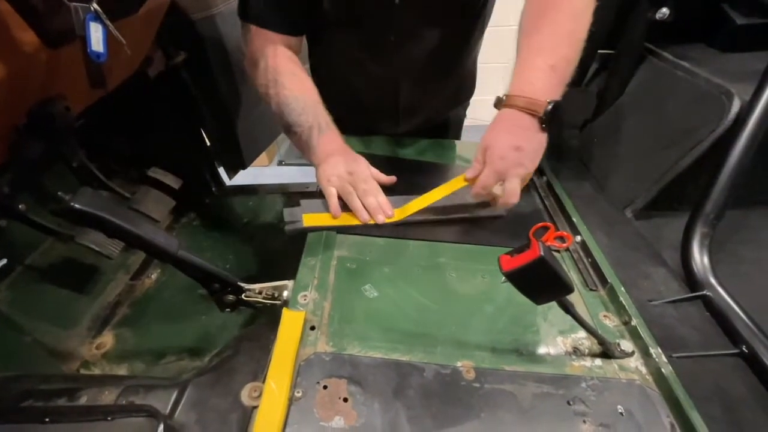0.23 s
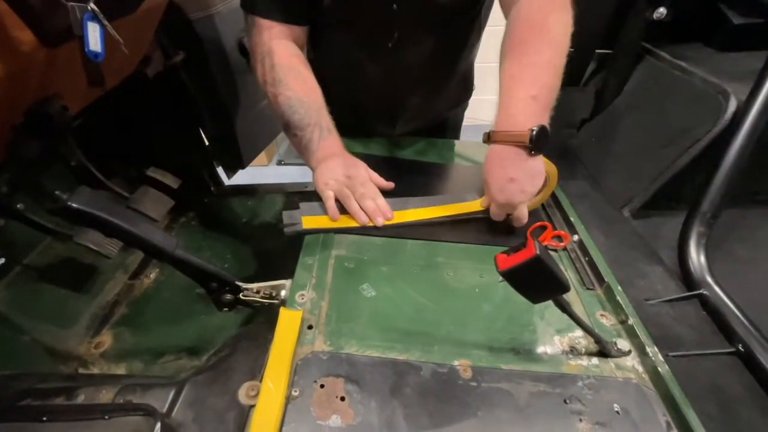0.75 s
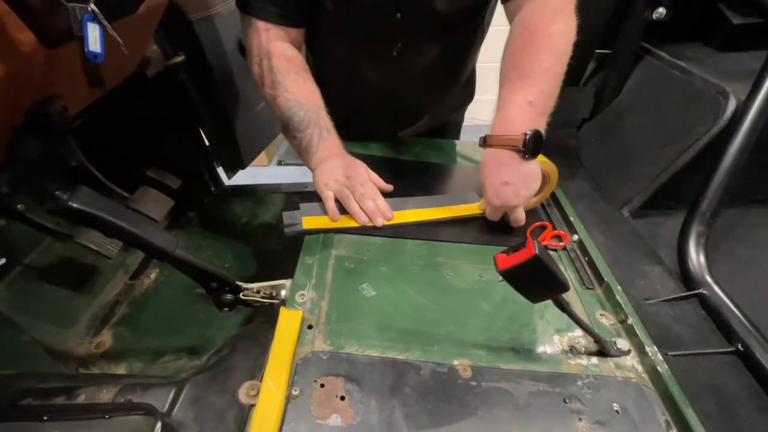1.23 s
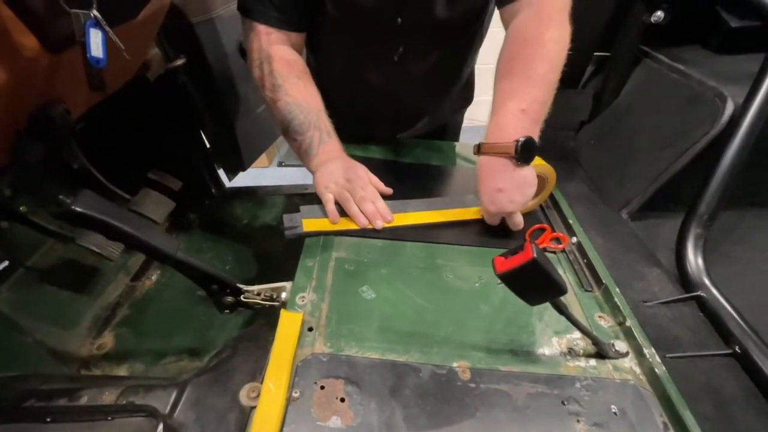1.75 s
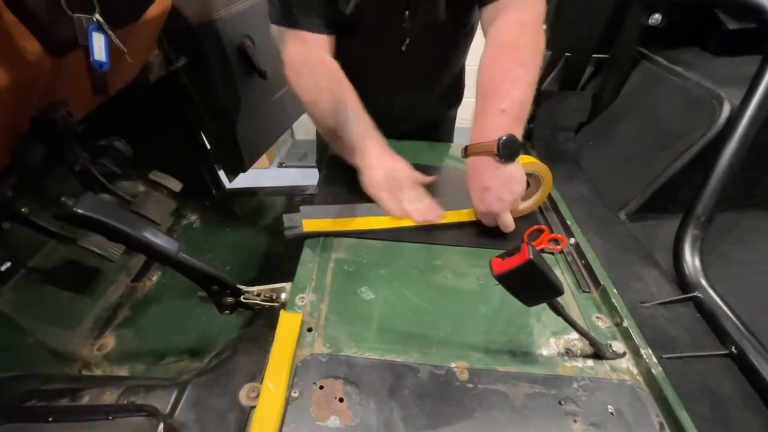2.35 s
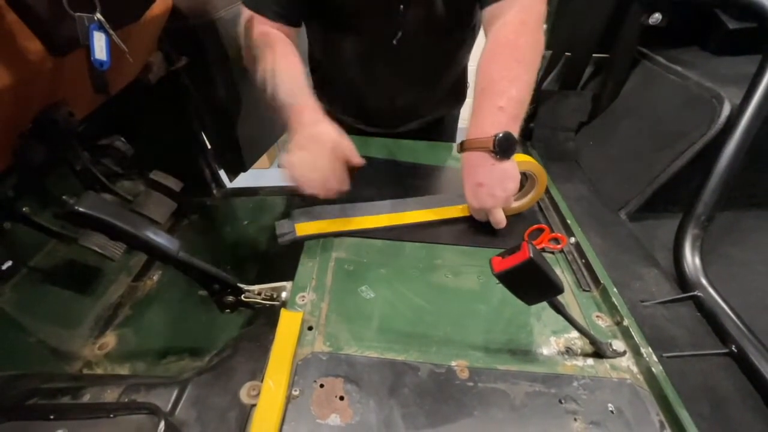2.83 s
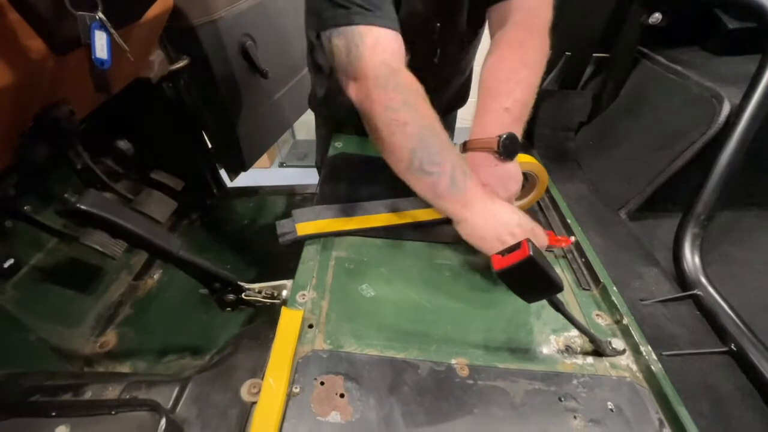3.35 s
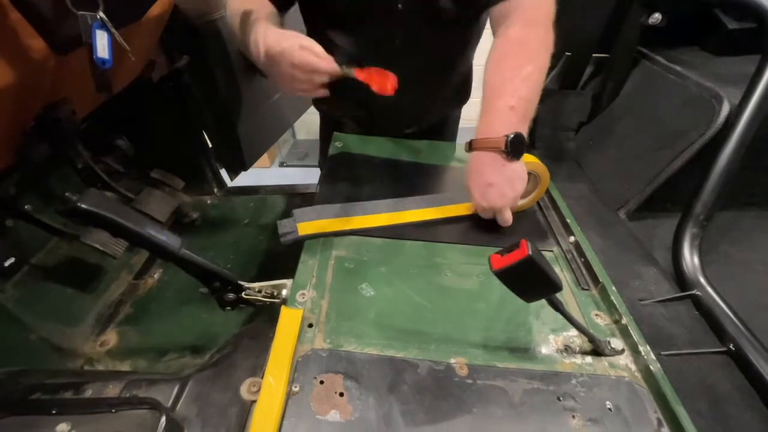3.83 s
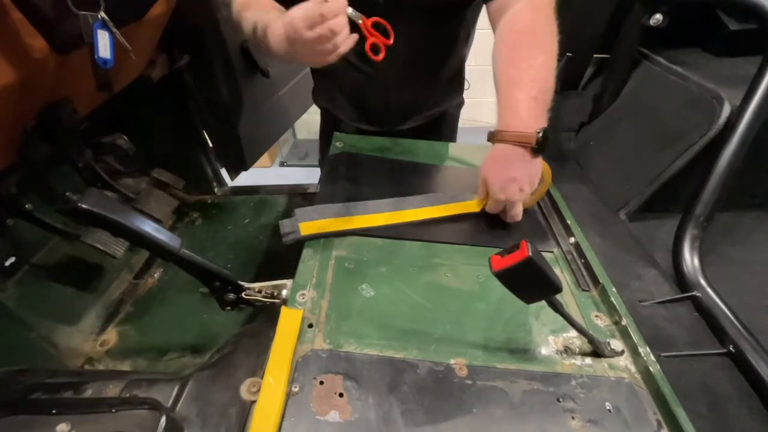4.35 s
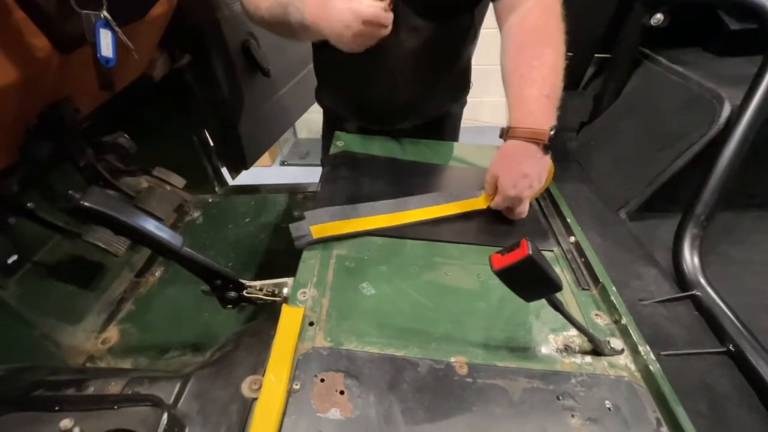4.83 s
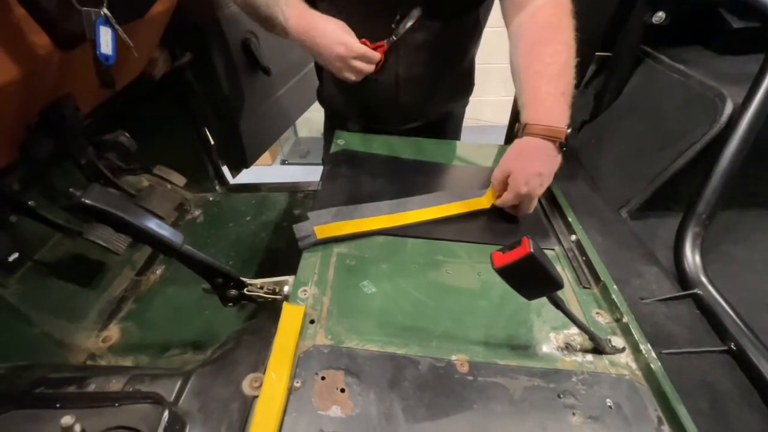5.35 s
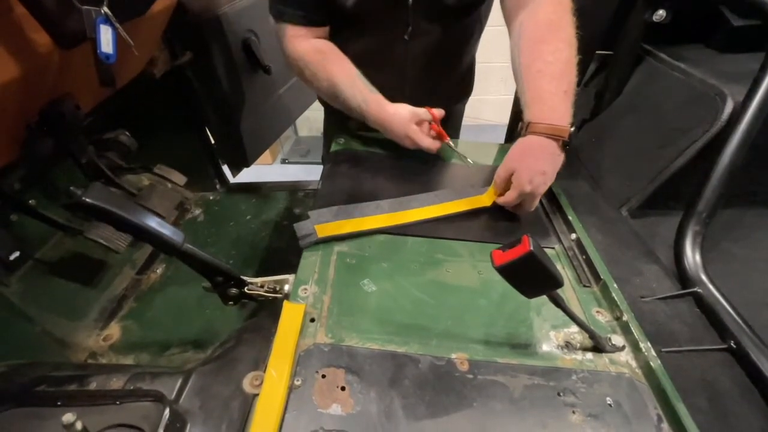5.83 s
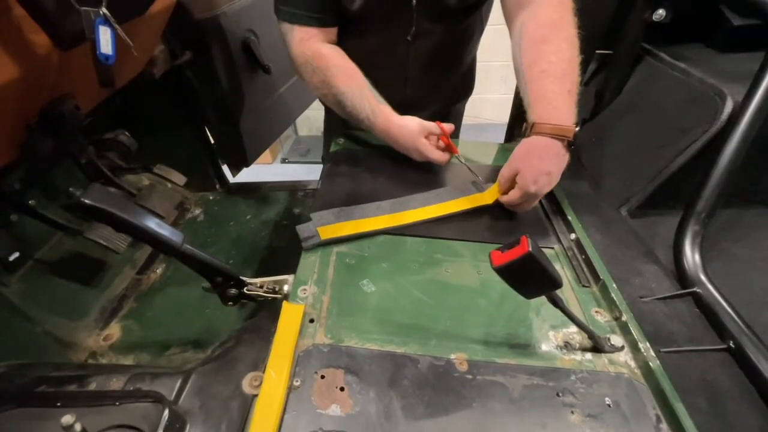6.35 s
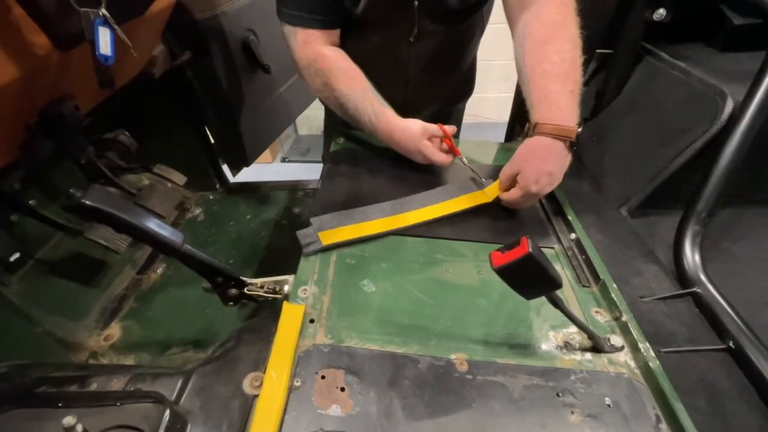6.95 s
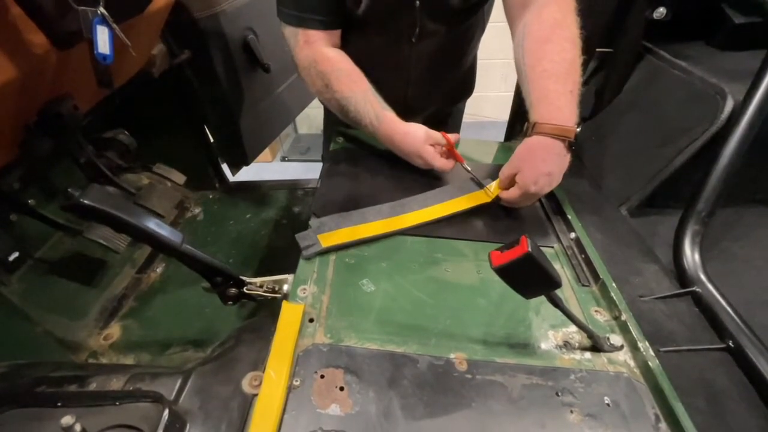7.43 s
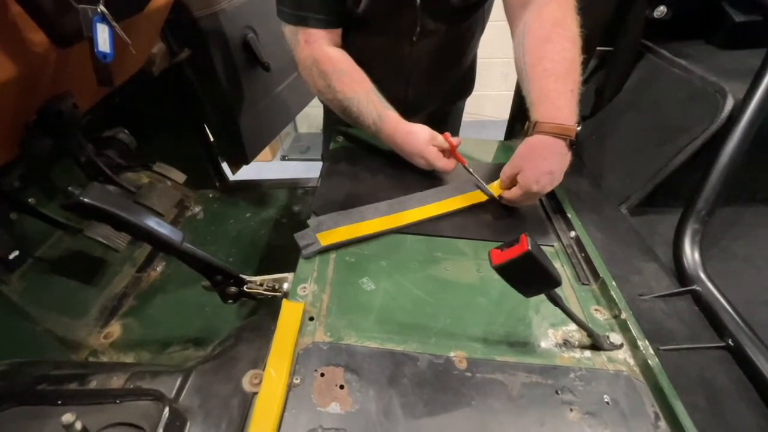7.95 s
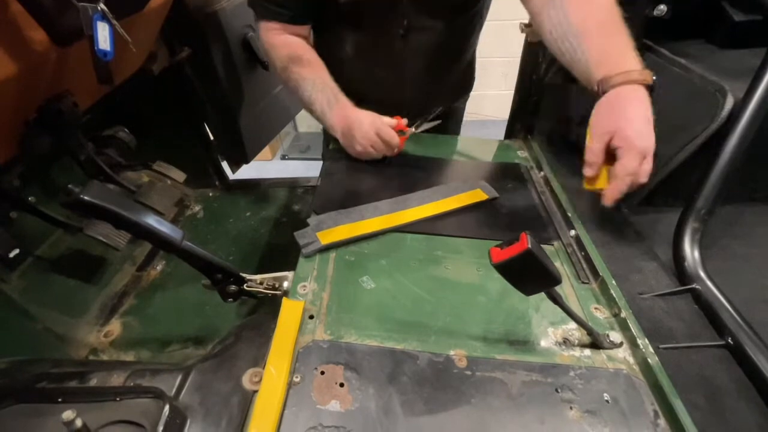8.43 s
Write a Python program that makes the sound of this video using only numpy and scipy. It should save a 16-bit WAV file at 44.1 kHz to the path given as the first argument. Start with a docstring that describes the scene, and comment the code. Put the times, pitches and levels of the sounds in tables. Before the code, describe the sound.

Close up in a metal vehicle interior, tape peels with fine crackling hiss, then a hand presses and rubs it onto carpet with soft hollow thuds. Scissors are picked up with small taps, click open and shut, pause, then cut the tape with one loud, bright snap. Light rustle and a dull thud end it. Distant machinery hums throughout; close stereo pickup, crisp and hissy on top.

```python
"""Sticky tape on a hollow floor

Close at hand, sticky tape is pulled off its roll, smoothed onto carpet on a hollow metal floor and cut with
small scissors. Glue crackles and blades crack as short noise sprays; blades, panel and taps ring as dying sines.
Palm and sleeves rustle and drag as coloured noise; far off, workshop machinery drones, hums and whirrs.
A pair of microphone ports, whose difference rings near 10 kHz, picks it all up."""
import sys
import numpy as np
from scipy import signal
from scipy.fft import rfft, irfft, next_fast_len
from scipy.io import wavfile

SR = 44100
rng = np.random.default_rng(int(sys.argv[2]) if len(sys.argv) > 2 else 0)


def wav_record(signal):
    """Record a signal, one row per channel, as 16-bit PCM in the file named by sys.argv[1]."""
    frames = np.transpose(np.atleast_2d(signal))
    bounded = np.clip(frames, -1, 1)
    # unit amplitude maps onto the largest positive 16-bit level
    quanta = np.round(bounded * 32767).astype(np.int16)
    wavfile.write(sys.argv[1], SR, quanta)


N = 382788

# Levels in the tables are relative; each source adds its own gain.
# Far machinery. Each row: time in seconds, drone in Hz, then drone, rumble, fan and whirr levels in dB.
SHOP = [(0, 55.05, -53.5, -56.5, -68.5, -59.5), (.41, 59.95, -50, -56.5, -68, -63.5),
        (.75, 55.15, -55.5, -58.5, -66.5, -66), (1.76, 62.17, -63, -56, -67, -67.5),
        (2.17, 61.3, -55.5, -50.5, -68, -70), (3.04, 62.1, -53.5, -54, -68.5, -61.5),
        (3.34, 63, -47.5, -54.5, -59.5, -59.5), (4.81, 59.28, -57.5, -57, -64, -60),
        (6.79, 59.8, -53, -58.5, -60, -61.5), (7.15, 63.97, -47.5, -58, -59, -60),
        (7.78, 69, -58.5, -55, -59, -62.5), (8.68, 68.8, -51.5, -56, -58, -61.5)]
# Colours of the machinery. Each row: frequency in Hz, density in dB per Hz.
RUMBLE_COLOUR = [(12, -64.5), (24, 0), (40, -13.5), (59, -6), (86, -3), (113, -7), (126, -8.5),
                 (140, -22.5), (168, -19.5), (200, -20.5), (260, -62.5), (440, -120)]
FAN_COLOUR = [(120, -6.5), (170, -2.5), (240, 3), (330, -9.5), (450, -14.5), (700, -40), (1200, -55)]
WHIRR_COLOUR = [(250, -11), (500, -1), (1020, 0.5), (1400, 0), (1860, -7), (2400, -3), (3100, -4),
                (3700, -18), (5000, -34.5), (8000, -50.5)]
# Fixed resonances of fan and whirr. Each row: centre in Hz, width in Hz, boost in dB.
FAN_PEAKS = [(230.8, 8.2, 10), (257.6, 17, 4.5), (339.7, 19.7, 10)]
WHIRR_PEAKS = [(1160, 210, 3), (2265, 46, 12.5), (2540, 250, 5.5)]
# A narrow band of hiss that wanders in the whirr. Each row: time in seconds, centre in Hz, level in dB.
WANDER = [(0, 1120, -72), (1, 1148, -75), (2, 1142, -76), (3, 1203, -71.5), (3.7, 1280, -62),
          (4.5, 1070, -73), (5.2, 1014, -82), (5.5, 1285, -72), (6.5, 1299, -69), (7.5, 1340, -67.5),
          (8.68, 1206, -77)]
# How alike the two ports hear noise. Each row: frequency in Hz, left-right likeness from 0 to 1.
LIKENESS = [(30, 0.99), (100, 1), (200, 0.75), (400, 0.72), (700, 0.2), (1300, 0.3), (2500, 0.069),
            (8000, 0.12)]
# Hand or roll landing on the panel. Each row: start in seconds, level in dB, pitch in Hz,
# time to fall 60 dB in seconds, rattle in dB against the thud.
THUDS = [(0.721, -31, 99, 0.13, -2), (1.98, -32, 120.5, 0.085, -10), (2.2, -37.5, 132.6, 0.24, -12),
         (2.615, -27, 138, 0.1, -8), (3.152, -23.5, 97, 0.45, -18), (3.837, -36, 110, 0.17, -28),
         (8.425, -34, 73.5, 0.56, -3.5), (8.489, -31, 68.6, 0.14, -13), (8.573, -21.5, 191, 0.078, -7.5),
         (8.622, -39.5, 92.6, 0.19, 3), (8.655, -37, 95, 0.22, -12)]
# Higher modes of the floor panel. Each row: frequency in Hz, level in dB, time to fall 60 dB in seconds.
PANEL_MODES = [(130.4, -2, 0.16), (206, -6, 0.058), (265, -4.5, 0.17), (352, -9, 0.028), (430, -29, 0.041),
               (685, -29, 0.053), (870, -22, 0.023)]
# Fingers and scissor handles touching the panel. Each row: start in seconds, level in dB, pitch in Hz,
# time for the lowest tone to fall 60 dB in seconds.
TAPS = [(.718, -38, 404, 0.031), (1.836, -59, 1500, .03), (1.851, -51, 2100, 0.025),
        (1.966, -46, 2110, .025), (1.9735, -53, 510, 0.04), (1.975, -45, 1870, .03),
        (1.984, -41, 476, 0.022), (1.985, -51, 2070, 0.02), (2.0, -44, 413, 0.036),
        (2.185, -50, 2110, 0.023), (2.194, -53, 2000, .02), (3.2237, -45, 615, 0.054),
        (3.246, -45, 437, 0.046), (3.272, -47, 503, 0.042), (3.291, -50, 890, .03), (3.3, -47, 1290, .03),
        (3.309, -43, 1720, 0.13), (3.322, -39, 750, 0.035), (3.334, -55, 2170, .04),
        (3.352, -45, 1140, 0.093), (3.365, -47, 513, 0.059), (5.355, -56.5, 640, 0.068),
        (5.955, -57, 796, 0.13), (6.02, -59, 1120, 0.086), (6.283, -64, 1200, .04),
        (6.632, -70, 1211, 0.036), (8.276, -54, 1188, 0.1), (8.361, -54, 1190, 0.053),
        (8.396, -54, 1150, .03), (8.456, -50.5, 1130, 0.081), (8.571, -38, 627, 0.031),
        (8.594, -38, 710, 0.066)]
# Hand dragging on the carpet, heard through the panel. Each row: start of the hold in seconds, rise, hold
# and fall in seconds, drag level in dB, brightness in dB; rise and fall span 20 dB.
DRAG = [(.33, 0.11, 0.021, 0.13, -61.5, -10), (.432, .03, 0.036, 0.13, -57.5, -3.5),
        (.642, 0.044, 0.058, .04, -69, -13.5), (.72, 0.015, 0, 0.092, -43.5, -16),
        (1.836, 0.0086, 0, 0.12, -50.5, -5), (1.978, 0.033, 0.011, 0.048, -45, -8),
        (2.12, 0.044, 0, .015, -60, -31.5), (2.25, 0.12, 0, .2, -60.5, -17),
        (2.44, 0.49, 0.054, 0.21, -55.5, 2.5), (2.62, 0.16, 0, 0.058, -51, -10.5),
        (3.2, 0.1, 0.09, .1, -52, -12.5), (3.312, 0.029, 0.045, 0.064, -46, -1.5),
        (3.365, 0.063, 0, 0.071, -42.5, -16.5), (3.7, 0.069, 0.012, .09, -56.5, -18),
        (3.83, 0.026, 0, 0.13, -52, -4), (5.352, .01, 0.068, 0.054, -60.5, -11),
        (5.97, 0.12, 0.07, .1, -70, 6), (6.1, 0.37, 0.051, 0.024, -65, -6),
        (6.9, 0.065, 0.00028, 0.1, -55.5, -0.5), (7.69, 0.11, 0.17, .03, -64, 4),
        (8.02, 0.061, 0.042, 0.079, -61, 1), (8.573, 0.0081, 0.00078, 0.084, -37, -27),
        (8.63, .05, 0.09, 0.094, -54, -19)]
# Dull and brighter part of the drag. Each row: frequency in Hz, density in dB per Hz.
DRAG_LOW = [(150, -24.5), (260, 3.5), (400, 0.5), (700, -5.5), (1000, -13.5), (1600, -25.5), (4000, -87)]
DRAG_HIGH = [(200, -22.5), (600, -7.5), (1180, 2), (1450, -7.5), (1750, -4.5), (2200, -3.5), (3000, -9),
             (4500, -29.5), (9000, -66)]
# Rubbing that favours one narrow band, under the palm or between fingers and tape. Each row: start in
# seconds, length in seconds, first and last centre in Hz, width in Hz, level in dB.
SINGING = [(2.27, 0.354, 1160, 1140, 130, -56), (2.33, .14, 1750, 2750, 330, -58),
           (2.40, 0.162, 1700, 1900, 300, -62), (2.38, 0.17, 4300, 4700, 600, -61),
           (6.1, 0.42, 5850, 5850, 180, -78), (5.55, .4, 4400, 4150, 900, -69),
           (5.6, 0.54, 3300, 3500, 590, -69), (5.76, 0.33, 1250, 1000, 250, -67),
           (8.232, .035, 6000, 5600, 640, -55), (8.27, .36, 2700, 2550, 270, -71.5)]
# Sleeves and loose tape, never quite still. Each row: time in seconds, rustle in dB, crispness in dB.
RUSTLE = [(0, -59.5, -10), (.3, -70, -13.5), (.5, -60.5, -2), (.78, -76, -7), (1.1, -84.5, -8),
          (1.56, -83.5, -9), (1.8, -75, -9), (2.75, -81.5, -7), (3.1, -68.5, -7), (3.58, -70.5, -9),
          (3.95, -64.5, -9.5), (4.2, -79, -26), (4.44, -68, -4), (4.55, -61.5, -3.5), (5.2, -64, -2.5),
          (5.67, -70, -18), (6.15, -80, -23), (6.6, -68, -7), (6.88, -65, -9), (7.19, -70.5, -9),
          (7.27, -81, -27), (7.4, -72, -28.5), (7.66, -75.5, -33), (8.1, -65, -4), (8.68, -72, -14)]
# Tape or palm brushing past. Each row: start of the hold in seconds, rise, hold and fall in seconds,
# rustle in dB, crispness in dB; rise and fall span 20 dB.
BRUSHES = [(.058, 0.096, 0, 0.063, -51, 7), (.14, 0.11, 0.075, 0.2, -53, -2),
           (.386, 0.025, 0.0077, 0.04, -60, -6), (.466, 0.004, 0.0022, 0.02, -49, 16),
           (.91, 0.093, 0, 0.13, -66.5, -6), (1.04, 0.015, 0.034, 0.088, -76, 2),
           (1.584, 0.034, 0, 0.07, -69, -1), (1.85, 0.028, 0, 0.064, -62, -1),
           (1.974, 0.16, 0.014, 0.072, -59, -4.5), (2.19, 0.012, 0, 0.016, -55, -8),
           (2.255, 0.039, 0.347, 0.034, -48.5, -1), (2.42, 0.22, 0.053, 0.18, -45.5, -7.5),
           (3.092, 0.028, 0.024, 0.088, -59.5, 10), (3.3, 0.035, 0.036, 0.08, -56.5, -7),
           (3.84, 0.032, 0, 0.023, -58, 21), (4.004, 0.067, 0.03, 0.14, -67, -6),
           (4.49, .02, 0, 0.049, -52, 4), (4.602, 0.011, 0.0077, 0.027, -58, 14),
           (4.682, 0.0097, 0.0078, 0.035, -51.5, 4), (5.47, .02, 0.038, 0.022, -60.5, 1),
           (5.72, 0.093, 0.015, 0.29, -75, -17), (5.596, 0.016, 0.013, 0.037, -50, 1.5),
           (6.134, 0.027, 0.018, 0.048, -70.5, -3), (6.92, 0.07, 0.034, .14, -62, -10),
           (7.0, .01, 0, 0.045, -58, 7), (7.42, 0.3, 0.12, .2, -79, -19),
           (7.82, 0.13, 0.035, 0.11, -46, -2.5), (7.984, 0.0026, 0.02, 0.049, -45, -2.5),
           (8.26, 0.059, 0.13, 0.21, -60.5, 5), (8.568, 0.004, 0.011, 0.033, -52, -1)]
# Glue pulled apart, pressed down or cut without pause. Each row: start in seconds, end in seconds.
PEELS = [(0, .5), (2.2, 2.63), (7.68, 7.83)]
# Dull, bright and topmost rustle. Each row: frequency in Hz, density in dB per Hz.
RUSTLE_DULL = [(900, -31), (1500, 1), (2400, 3), (4500, 7.5), (6500, 3.5), (9500, -7), (12500, -73)]
RUSTLE_BRIGHT = [(2000, -40), (4000, -29.5), (6500, -4.5), (9500, 13), (10400, -8), (11500, -28),
                 (14000, -53.5)]
RUSTLE_TOP = [(9500, -62), (10400, -3), (11200, -2), (12100, -20), (12800, -48)]
# Resonances of the dull rustle. Each row: centre in Hz, width in Hz, boost in dB.
RUSTLE_PEAKS = [(2190, 530, 5.5), (4430, 270, -0.5)]
# Scissor blades. Each row: start in seconds, level in dB, decay constant in seconds,
# high-pass corner in Hz, ringing of the loose pivot in dB against the contact.
SNIPS = [(3.822, -37, 0.002, 1100, 0.5), (4.4613, -25.5, 0.0036, 6240, -11),
         (4.466, -32.5, 0.004, 4600, -1), (4.478, -41, 0.0068, 6000, 4), (4.494, -46, 0.0053, 6000, 7.5),
         (4.6, -46, 0.0024, 4000, 9), (4.6812, -46.5, 0.0025, 3000, 12.5),
         (5.1537, -66.5, 0.0036, 4000, 16), (5.443, -22, 0.002, 5300, -11),
         (5.445, -41.5, 0.0043, 900, -22), (5.4461, -26.5, 0.0052, 4740, 4),
         (5.461, -44, 0.0044, 2495, -14), (5.584, -43, .006, 5000, -3), (5.594, -45, 0.0049, 5500, -5),
         (7.824, -30, 0.0017, 2500, -25), (7.828, -2, 0.0013, 8500, -30), (7.8291, -21, 0.0033, 1090, -20),
         (7.8308, -15.5, 0.004, 3330, -16), (7.981, -30.5, 0.0067, 3200, -22),
         (7.9886, -29.5, 0.0042, 2040, -29), (7.991, -27.5, 0.0026, 1822, -33),
         (8.252, -35, 0.002, 5530, -16)]
# Blade and pivot modes. Each row: frequency in Hz, level in dB, time to fall 60 dB in seconds.
BLADE_MODES = [(1980, 4, .025), (2330, -3, .02), (3120, -8, .02), (3690, -2, .02), (4260, -4, .025),
               (4430, -2, .03), (4900, -5, .02), (5800, -9, .03), (6320, -8, .03), (6580, -7, .07),
               (6830, -6, .07), (7150, -8, .04), (7850, -2, .035), (8200, -2, .025), (8600, 3, .015),
               (9400, 0, .008), (11700, 4, .015), (14800, 3, .012)]
PIVOT_MODES = [(7543, 0, 0.045), (7895, -6, 0.03), (8600, -4, 0.012)]
# Glue letting go. Each row: start in seconds, level in dB, high-pass corner in Hz.
TICKS = [(.039, -47, 4000), (.046, -42, 7000), (.061, -37, 7000), (.128, -34, 7500), (.15, -40, 7000),
         (0.164, -31.5, 7000), (.168, -34, 7000), (.193, -32, 7500), (.267, -46, 3000), (.3577, -55, 4500),
         (.381, -42, 4500), (.3944, -49, 4000), (.456, -40, 4000), (0.4644, -31, 3280), (.674, -50, 7000),
         (0.804, -56, 6000), (0.8693, -43.5, 3000), (0.9038, -41.5, 3000), (1.034, -48.5, 3000),
         (1.578, -71, 3000), (1.835, -47, 1190), (1.844, -49, 2350), (1.9245, -45.5, 1800),
         (1.974, -39.5, 1200), (2.184, -57, 1800), (2.2275, -54, 1500), (3.0838, -56, 4900),
         (3.309, -50, 1000), (6.123, -57, 5000), (6.901, -42.5, 1500), (6.996, -43.5, 3000),
         (7.0768, -46, 6950), (7.183, -49, 6900), (7.339, -47, 5820), (7.515, -42.5, 7020),
         (7.561, -44, 7000), (7.687, -45, 3990), (7.719, -43, 2400), (7.754, -41, 2400), (7.782, -35, 2400),
         (7.805, -52, 2400)]

RIGHT_LAG_S = .00043   # rubbing, panel and machinery reach the right port later
PORT_HZ, PORT_WIDTH_HZ, PORT_DB = 10250, 900, 11


def from_db(db):
    """Decibels to gain."""
    return 10 ** (np.asarray(db) / 20)


def rms_one(x):
    """Scale to rms 1."""
    return x / np.sqrt(np.mean(x ** 2) + 1e-20)


def in_time(rows):
    """Each column of a curve, sample by sample."""
    s, *columns = np.transpose(rows)
    return [np.interp(np.arange(N) / SR, s, column) for column in columns]


def at_hz(points, hz):
    """A spectrum read on a log axis."""
    point_hz, value = np.transpose(points)
    return np.interp(np.log(hz + 1), np.log(point_hz + 1), value)


def drift(rate):
    """Slow chance of spread 1, wandering about rate times a second."""
    knots = rng.standard_normal(N // 40 + 2002)   # one knot every 40 samples
    r = np.exp(-80 * np.pi * rate / SR)
    slow = signal.lfilter([1], [1, -2 * r, r * r], knots)[2000:]   # past the filter's start
    return np.interp(np.arange(N) / 40, np.arange(len(slow)), rms_one(slow))


def ring(force, modes):
    """A force sets a body ringing: convolution with the sum of its dying modes."""
    t = np.arange(SR // 4) / SR
    body = sum(from_db(db - 60 * t / max(t60, .005)) * np.sin(2 * np.pi * hz * t) for hz, db, t60 in modes)
    return signal.oaconvolve(force, body[None], axes=1)[:, :N]


def coloured(pair, spectrum, peaks=(), patch_db=0, patch_rate=1):
    """Two noises become left and right of given colour and likeness, rms 1; patch_db lets half octaves swell."""
    size = next_fast_len(N)
    hz = np.arange(size // 2 + 1) * SR / size
    alike = np.clip(at_hz(LIKENESS, hz), -1, 1)
    colour_db = at_hz(spectrum, hz)
    for top_hz, width, db in peaks:
        colour_db = colour_db + db / (1 + (2 * (hz - top_hz) / width) ** 2)
    mid, side = rfft(pair, size) * from_db(colour_db) * np.sqrt([1 + alike, 1 - alike])
    both = np.array([mid + side, mid - side])
    if not patch_db:
        return rms_one(irfft(both, size)[:, :N])
    place = np.clip(2 * np.log2(hz / 500 + 1e-9), 0, 9)   # half octaves above 500 Hz
    out = 0
    for k in range(10):
        band = irfft(both * np.maximum(1 - abs(place - k), 0), size)[:, :N]
        out = out + band * from_db(patch_db * drift(patch_rate))
    return rms_one(out)


def grains(per_s, spread_db):
    """Random clicks of uneven size; both trains share their moments."""
    sizes = from_db(spread_db * np.minimum(rng.exponential(1, N), 3.5))
    sizes = sizes * (rng.random(N) < per_s / SR)
    return rms_one(sizes * rng.standard_normal((2, N)))


def bursts(events, rise_s):
    """Each contact is a short dying spray of noise, thinned below its high-pass corner."""
    out, t = np.zeros((2, N + 4096)), np.arange(4096) / SR
    noises = rng.uniform(-1, 1, (len(events), 2, 4096))
    for (s, db, decay_s, low_hz), noise in zip(events, noises):
        decay = np.exp(-np.maximum(t - rise_s, 0) / max(decay_s, .0003))
        shape = np.minimum(t / rise_s, 1) * decay
        high_pass = signal.butter(3, np.clip(low_hz, 200, 9000), "high", fs=SR)
        start = round(s * SR)
        out[:, start:start + 4096] += from_db(db) * signal.lfilter(*high_pass, noise * shape)
    return out[:, :N]


def strokes(rows, tilts):
    """Each stroke rises, holds and falls; one gain per layer, tilted by the stroke's colour."""
    t, power = np.arange(0, N, 16) / SR, 0
    for s, rise, hold, fall, db, colour_db in rows:
        before, after = (s - t) / max(rise, .003), (t - s - hold) / max(fall, .003)
        away = np.maximum(np.maximum(before, after), 0)
        layer_db = db - 20 * away + colour_db * np.array(tilts)[:, None]
        power = power + from_db(2 * layer_db)
    return [np.interp(np.arange(N) / SR, t, np.sqrt(p)) for p in power]


def workshop():
    """Far machinery: a wavering drone, a deep hum of fixed pitch, rumble, a fan and a whirr with resonances."""
    hz, drone_db, rumble_db, fan_db, whirr_db = in_time(SHOP)
    turn = 2 * np.pi * np.cumsum(hz * (1 + 0.0259 * drift(4.1))) / SR
    drone = from_db(drone_db + 5.0 + 0.92 * drift(12.0)) * np.sin(turn)
    hum = from_db(drone_db - 4) * np.sin(2 * np.pi * 31.7 * np.arange(N) / SR)   # 31.7 Hz
    rumble = from_db(rumble_db + 4.5) * coloured(rng.standard_normal((2, N)), RUMBLE_COLOUR)
    air = rng.standard_normal((2, N))   # feeds both fan and whirr
    fan = from_db(fan_db + 3.5) * coloured(air, FAN_COLOUR, FAN_PEAKS)
    whirr = coloured(air, WHIRR_COLOUR, WHIRR_PEAKS, patch_db=3.0, patch_rate=3.84)
    return drone + hum + rumble + fan + from_db(whirr_db + 0.5) * whirr


def wander():
    """A narrow hiss in the whirr: slow noise carried on a moving centre frequency."""
    hz, db = in_time(WANDER)
    turn = 2 * np.pi * np.cumsum(hz) / SR
    low_pass = signal.butter(2, 114 / 2, fs=SR)   # half of the 114 Hz width
    a, b, c, d = signal.lfilter(*low_pass, rng.standard_normal((4, N)))
    near = a * np.sin(turn) + b * np.cos(turn)
    far = c * np.sin(turn) + d * np.cos(turn)
    return from_db(db) * rms_one(np.array([near, 0.22 * near + far]))


def room(x):
    """Dense reflections off nearby metal: dying noise, its own on each side, dull at the very top."""
    t = np.arange(SR // 4) / SR
    tail = rng.standard_normal((2, len(t))) * from_db(-60 * t / 0.1)   # falls 60 dB in 0.1 s
    tail = tail * (t > .0015)
    tail = signal.sosfilt(signal.butter(6, 12300, fs=SR, output="sos"), tail)
    return from_db(-36.5) * signal.fftconvolve(x, tail, axes=1)[:, :N]


def thuds():
    """A soft push rings the panel where it lands and rattles its higher modes."""
    length = 20000
    note, rattle, t = np.zeros(N + length), np.zeros((2, N + length)), np.arange(length) / SR
    swell = 1 - np.exp(-t / 0.0058)
    noises = rng.standard_normal((len(THUDS), 2, length))
    for (s, db, hz, t60, rattle_db), noise in zip(THUDS, noises):
        start = round(s * SR)
        at = slice(start, start + length)
        note[at] += from_db(db - 1.0 - 60 * t / t60) * swell * np.sin(2 * np.pi * hz * t)
        shake = noise[0] + .5 * noise * [[0], [1]]   # the right side gets some noise of its own
        rattle[:, at] += from_db(db + rattle_db - 32.0) * shake * np.exp(-t / 0.025)
    return note[:N] + ring(rattle, PANEL_MODES)


def taps():
    """A hard small contact rings briefly at its own pitch and, more weakly, at two higher ones."""
    out, t = np.zeros(N + 8000), np.arange(8000) / SR
    for s, db, hz, t60 in TAPS:
        start = round(s * SR)
        for ratio, part_db in [(1, -0.5), (1.47, -20), (2.3, -18.5)]:
            tone = from_db(part_db - 60 * ratio * t / t60) * np.sin(2 * np.pi * ratio * hz * t)
            out[start:start + 8000] += from_db(db) * tone
    return out[:N]


def drag():
    """Carpet fibres catch under the hand; the panel passes a dull and a brighter part."""
    low_gain, high_gain = strokes(DRAG, [0, 1])
    low = low_gain * coloured(grains(3000, 1.6), DRAG_LOW)
    return low + high_gain * coloured(grains(4000, 1.3), DRAG_HIGH)


def singing():
    """Each rub is slow noise carried on a gliding centre frequency."""
    half_s = SR // 2
    out, t = np.zeros((2, N + SR)), np.arange(half_s) / SR
    noises = rng.standard_normal((len(SINGING), 3, 2, half_s))
    for (s, length, from_hz, to_hz, width_hz, db), noise in zip(SINGING, noises):
        turn = 2 * np.pi * np.cumsum(np.interp(t, [0, length], [from_hz, to_hz])) / SR
        slow = signal.lfilter(*signal.butter(2, width_hz / 2, fs=SR), noise)
        common, left, right = slow[:, 0] * np.sin(turn) + slow[:, 1] * np.cos(turn)
        shape = np.clip(np.minimum(t, length - t) / min(0.035, length / 4), 0, 1)   # soft edges
        rub = rms_one(common + 1.8 * np.array([left, right]))
        start = round(s * SR)
        out[:, start:start + half_s] += from_db(db) * shape * rub
    return out[:, :N]


def rustle():
    """Dense fine friction, flickering, crackly while glue parts; a crisper contact shifts it to the treble."""
    level_db, crisp_db = in_time(RUSTLE)
    dull_gain, bright_gain = strokes(BRUSHES, [-.5, .5])
    dull_gain = np.hypot(dull_gain, from_db(level_db - crisp_db / 2))
    bright_gain = np.hypot(bright_gain, from_db(level_db + crisp_db / 2))
    t = np.arange(N) / SR
    peeling = sum((t >= start) & (t < end) for start, end in PEELS)
    share = np.where(peeling, .4, .1)   # power share of the crackle
    friction = np.sqrt(1 - share) * rng.standard_normal((2, N)) + np.sqrt(share) * grains(2500, 2.8)
    dull = coloured(friction, RUSTLE_DULL, RUSTLE_PEAKS, patch_db=2.0, patch_rate=22)
    bright = coloured(friction, RUSTLE_BRIGHT)
    # below a bright gain of -56 dB the topmost fizz fades faster than the rest
    top_gain = from_db(-1) * np.minimum(bright_gain / from_db(-56), 1) ** 1.1
    top = coloured(friction, RUSTLE_TOP) * top_gain
    flicker = from_db(-3.0 + 0.23 * drift(39))
    return flicker * (dull * dull_gain + (bright + top) * bright_gain)


def glue():
    """Each bit of glue letting go is a short noise tick, dull at the very top."""
    ticks = bursts([(s, db, 0.0061, hz) for s, db, hz in TICKS], rise_s=0.0004)   # decay constant 6.1 ms
    low_pass = signal.butter(8, 11900, fs=SR, output="sos")
    return from_db(2.5) * signal.sosfilt(low_pass, ticks)


def scissors():
    """Each contact cracks, rings the blades briefly and shakes the pivot, which faces the left port."""
    rows = np.array(SNIPS)
    contacts, pivot_db = rows[:, :4], rows[:, 4:]
    crack = bursts(contacts, rise_s=0.00032)
    shake = bursts(contacts + pivot_db * [0, 1, 0, 0], rise_s=0.0001)   # added to the level column
    blades = from_db(4.5) * crack + from_db(-25.5) * ring(crack, BLADE_MODES)
    return blades + ring(shake, PIVOT_MODES) * from_db([[-17], [-24]])


def scene():
    """All sources; the left port is a little nearer to the hands."""
    sharp = glue() + scissors() + taps()
    rubbing = (rustle() + drag() + singing()) * from_db([[.7], [-.7]])
    left, right = rubbing + thuds() + workshop() + wander()
    late = np.pad(right, (round(RIGHT_LAG_S * SR), 0))[:N]
    return (sharp + room(sharp)) * from_db([[1.2], [-1.2]]) + np.array([left, late])


def record(dry):
    """The ports ring in opposition near 10 kHz, where their sum is weak; peaks are rounded, the top is cut."""
    mid, side = (dry[0] + dry[1]) / 2, (dry[0] - dry[1]) / 2
    b, a = signal.iirpeak(PORT_HZ, PORT_HZ / PORT_WIDTH_HZ, fs=SR)
    side = side + from_db(PORT_DB) * signal.lfilter(b, a, side)
    mid = signal.lfilter(*signal.iirnotch(10150, 7.0, fs=SR), mid)
    # treble falls away above the ringing
    side = signal.sosfilt(signal.butter(4, 11300, fs=SR, output="sos"), side)
    mid = signal.sosfilt(signal.butter(3, 11900, fs=SR, output="sos"), mid)
    rounded = .9 * np.tanh(np.array([mid + side, mid - side]) / .9)
    return signal.sosfilt(signal.cheby2(12, 70, 16900, fs=SR, output="sos"), rounded)


dry = scene()
out = record(dry)
wav_record(out)
```